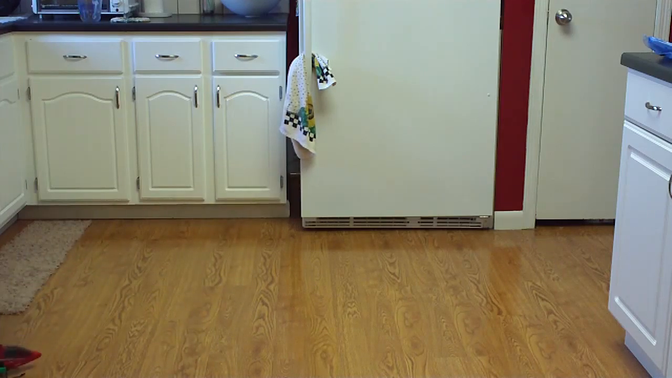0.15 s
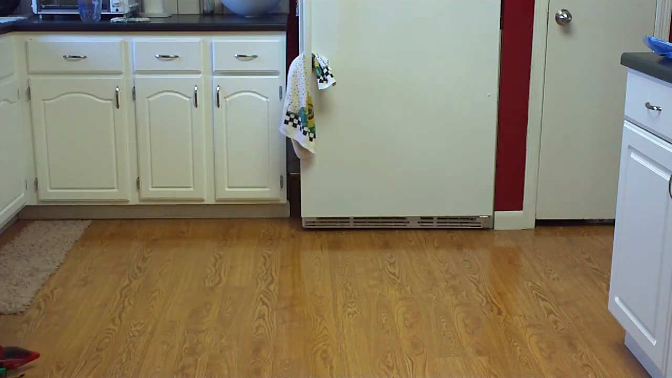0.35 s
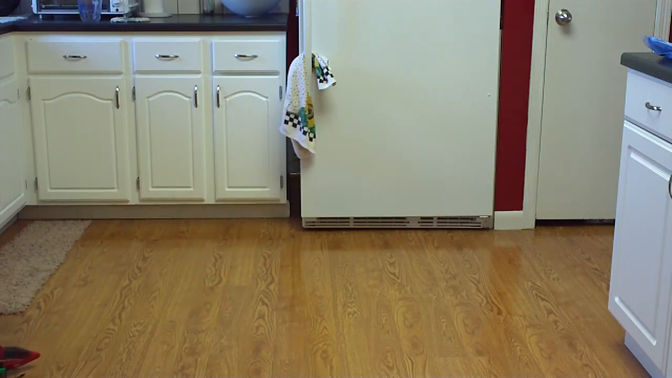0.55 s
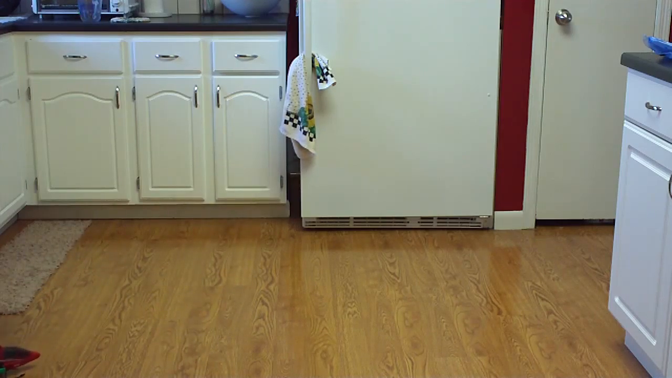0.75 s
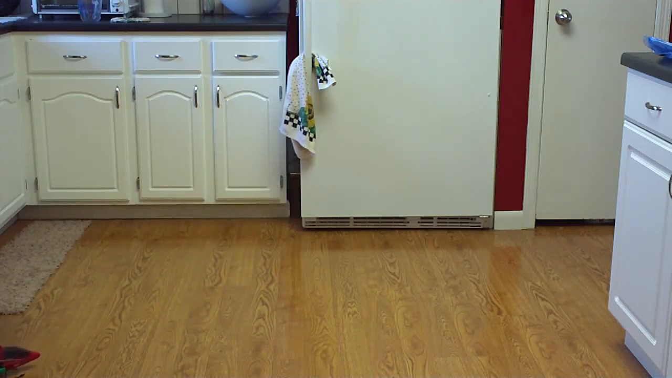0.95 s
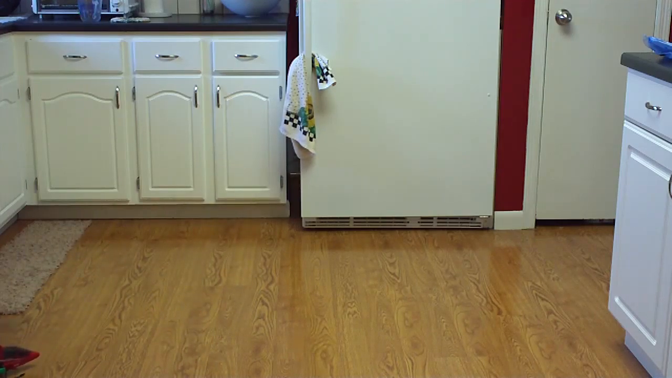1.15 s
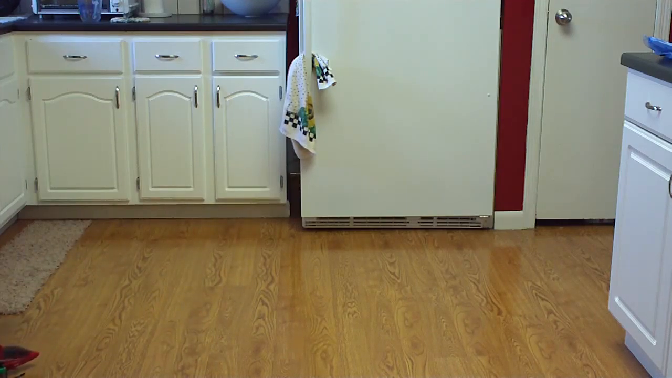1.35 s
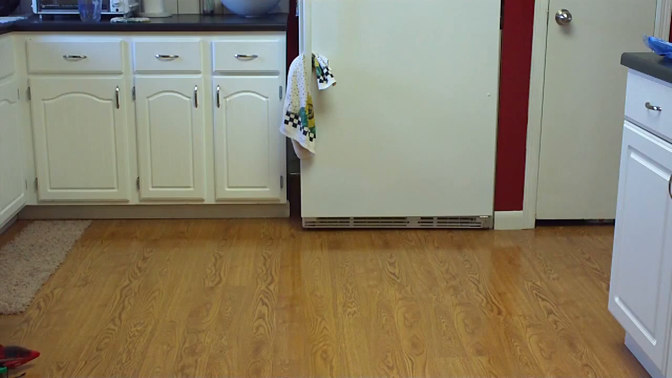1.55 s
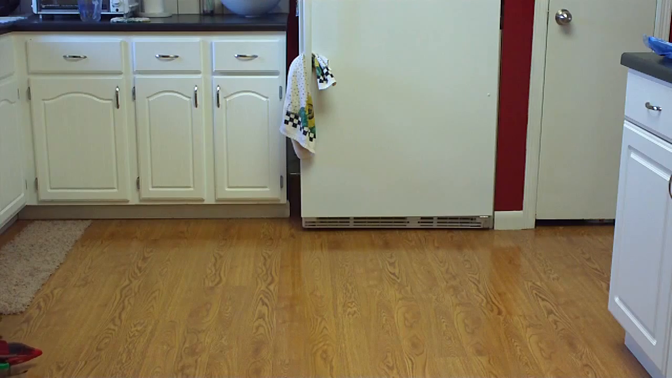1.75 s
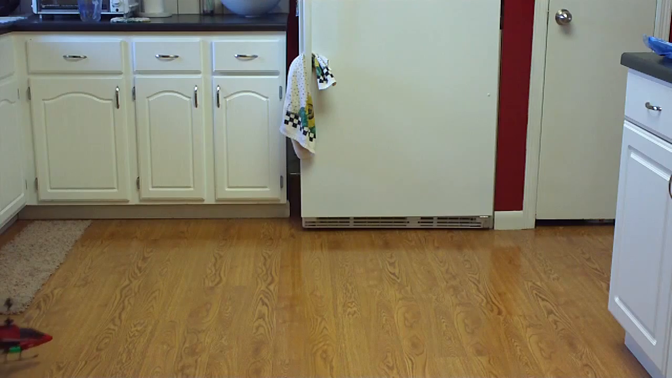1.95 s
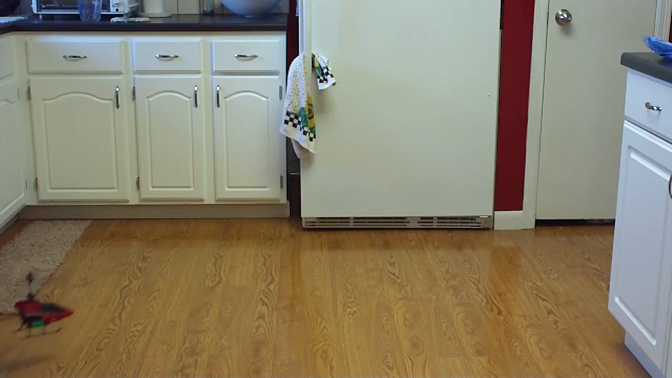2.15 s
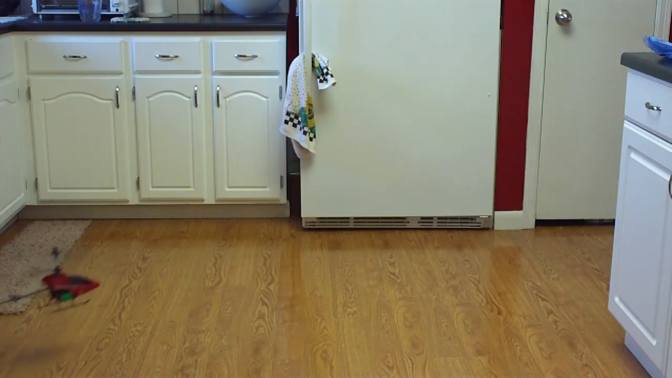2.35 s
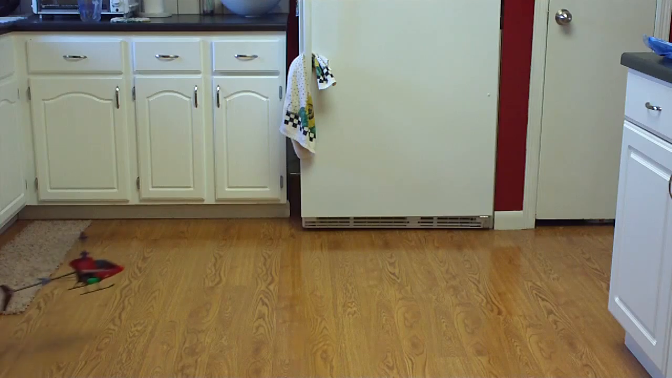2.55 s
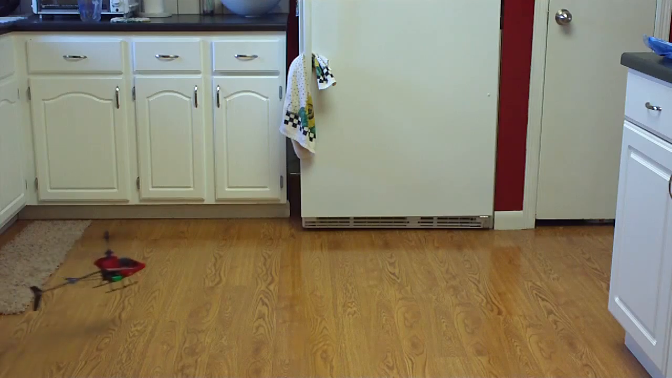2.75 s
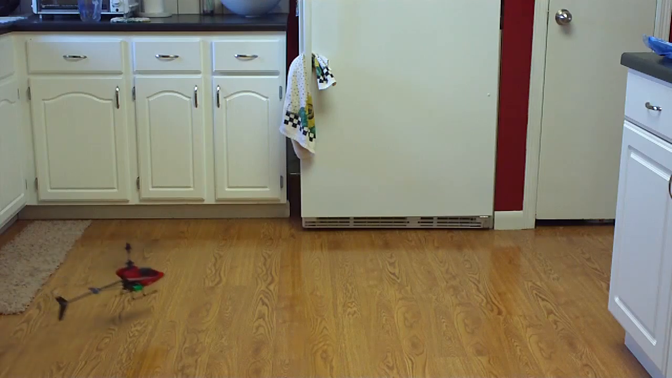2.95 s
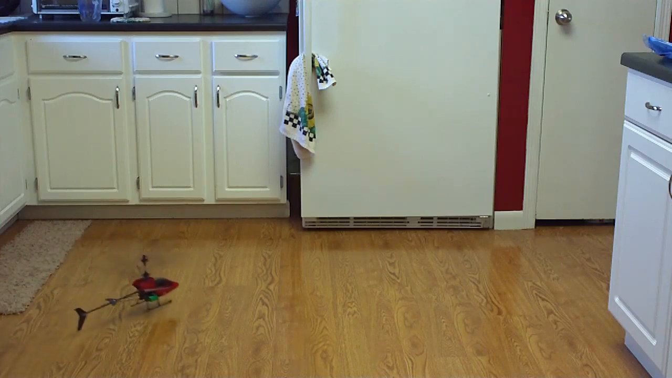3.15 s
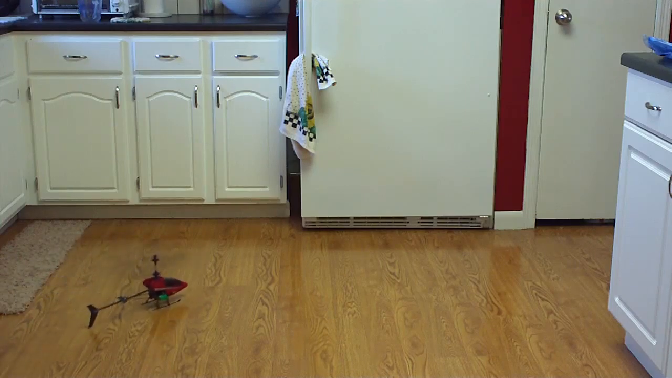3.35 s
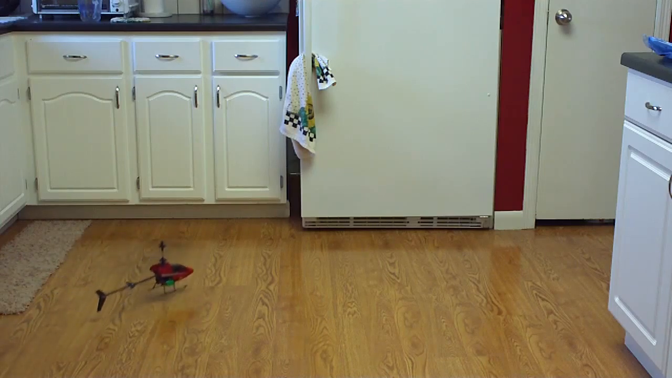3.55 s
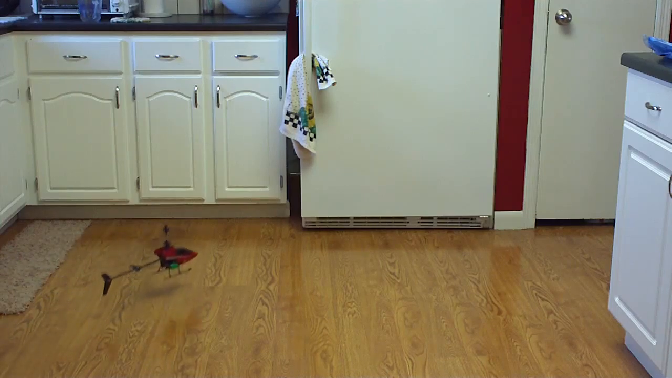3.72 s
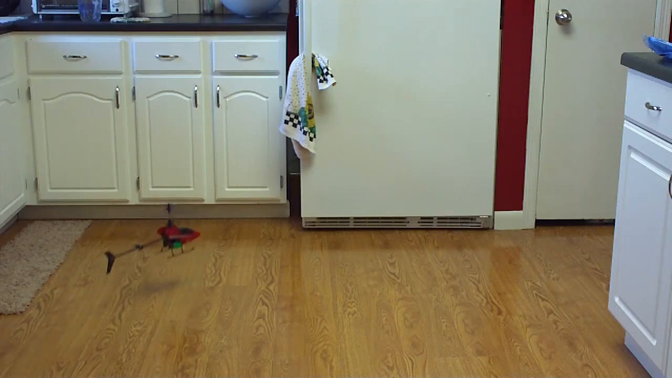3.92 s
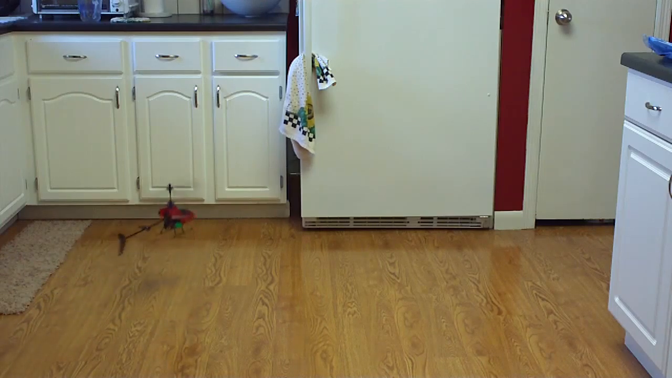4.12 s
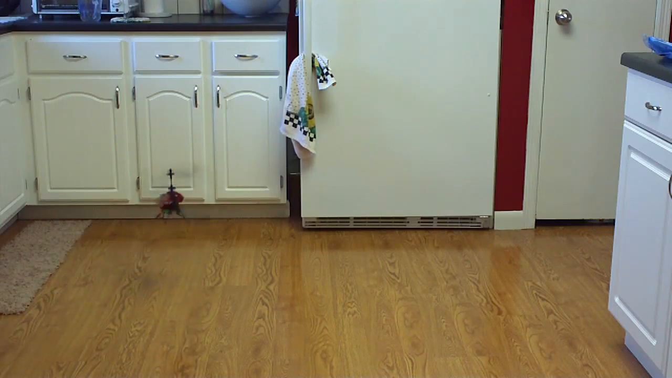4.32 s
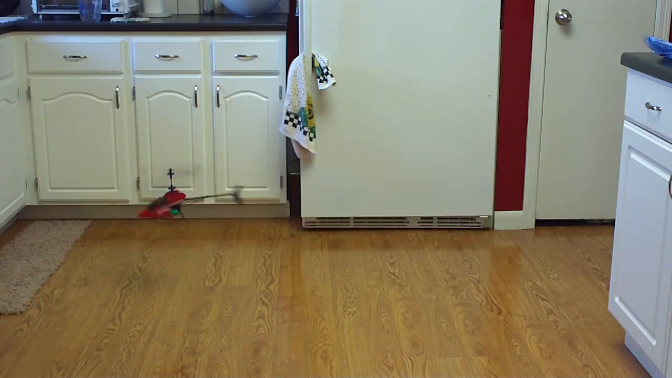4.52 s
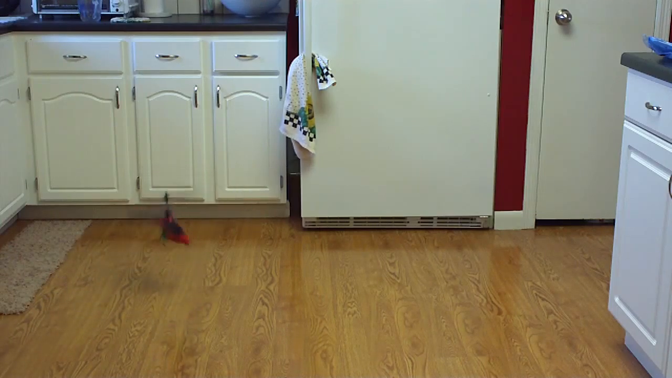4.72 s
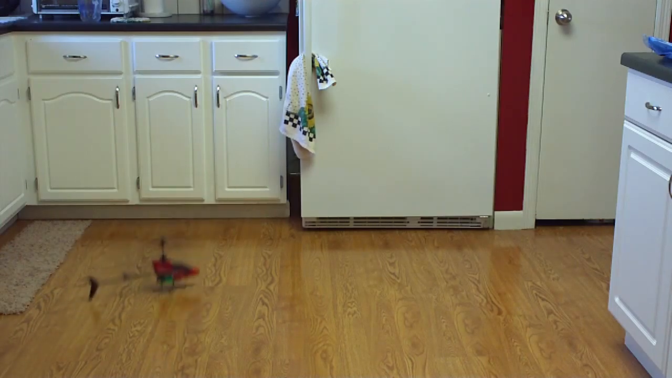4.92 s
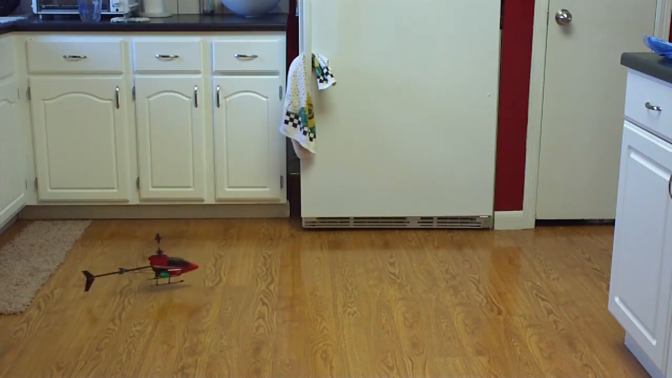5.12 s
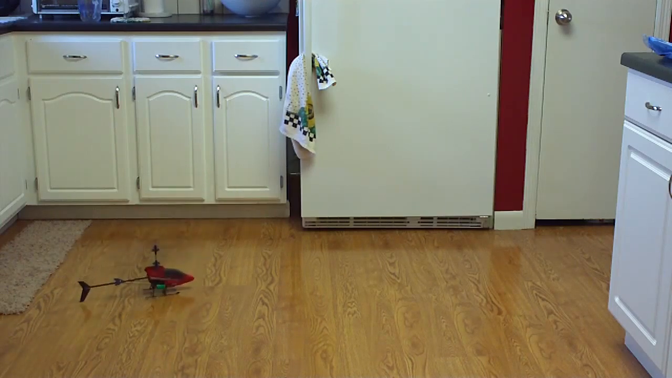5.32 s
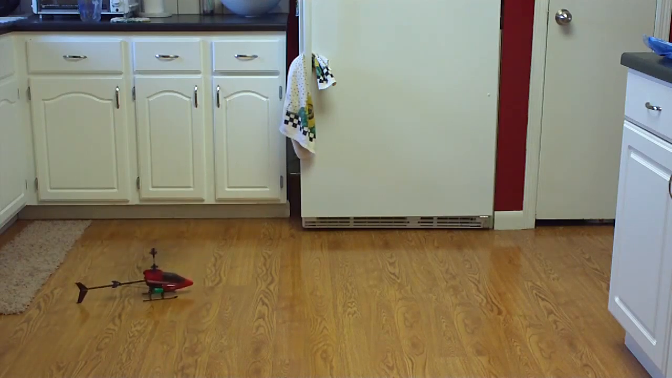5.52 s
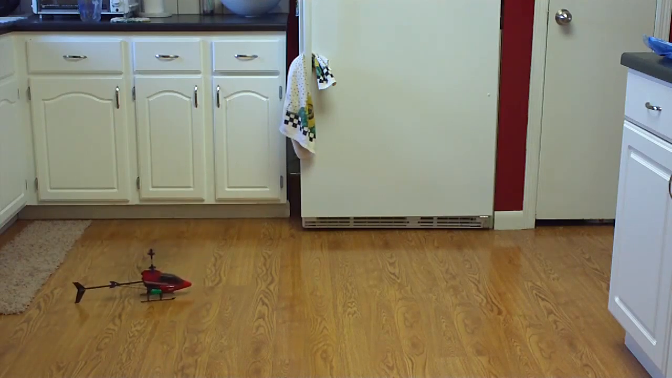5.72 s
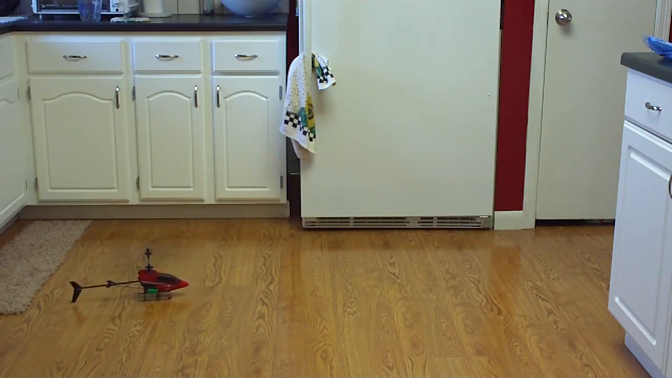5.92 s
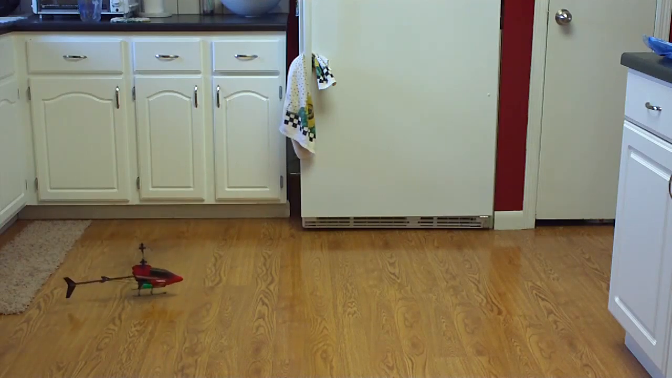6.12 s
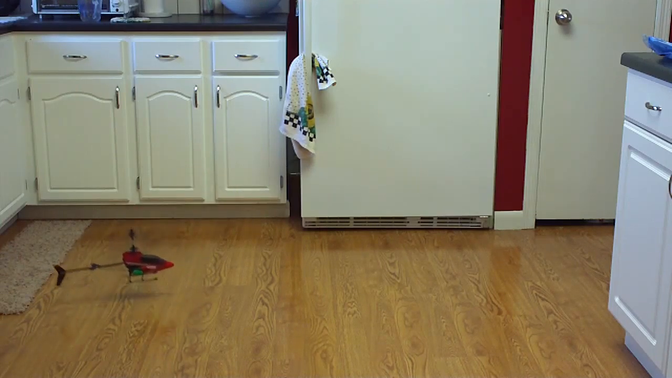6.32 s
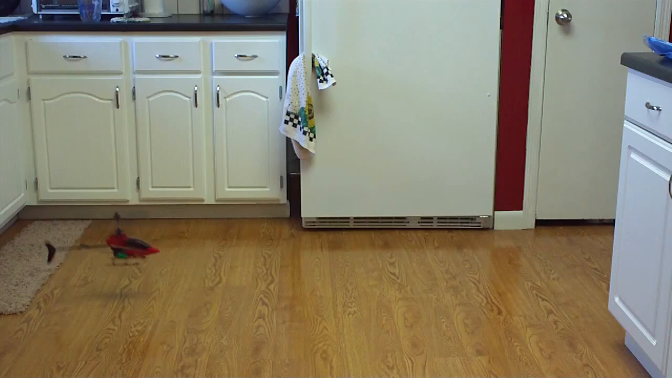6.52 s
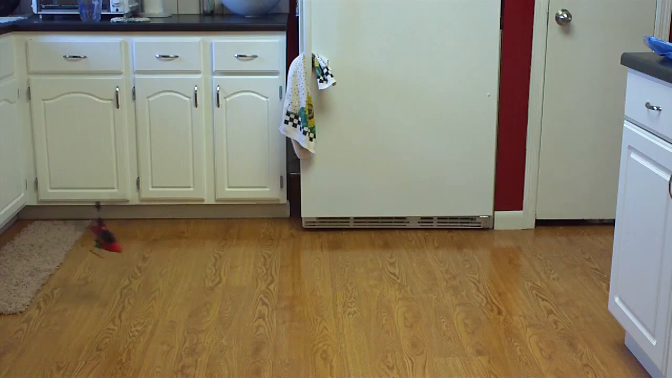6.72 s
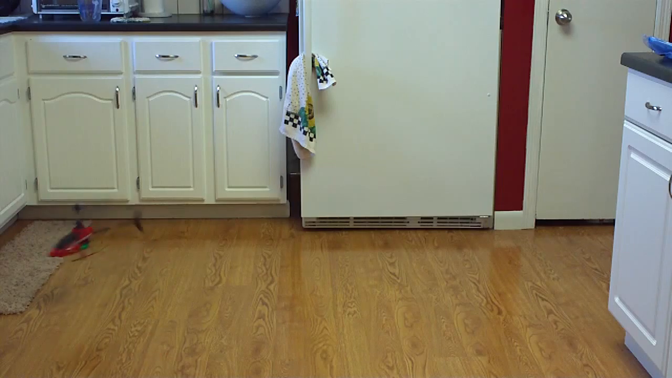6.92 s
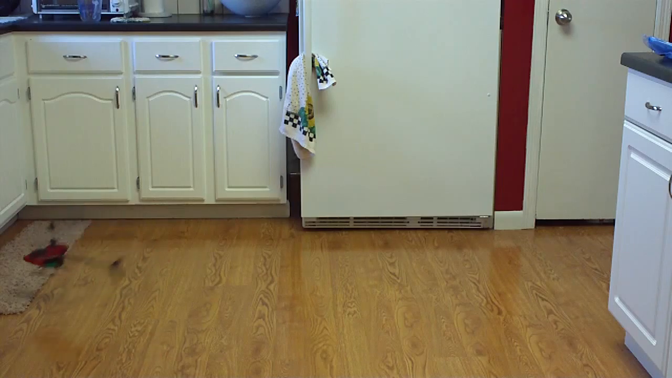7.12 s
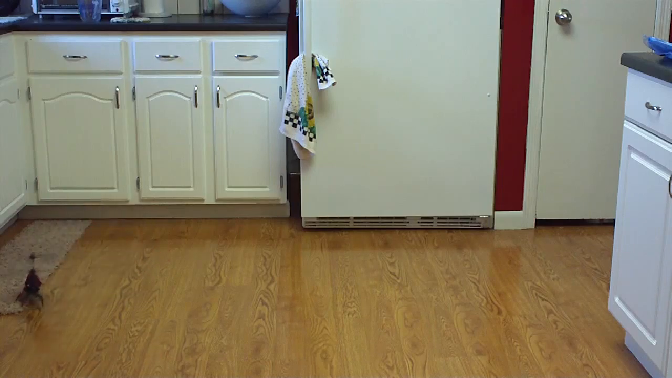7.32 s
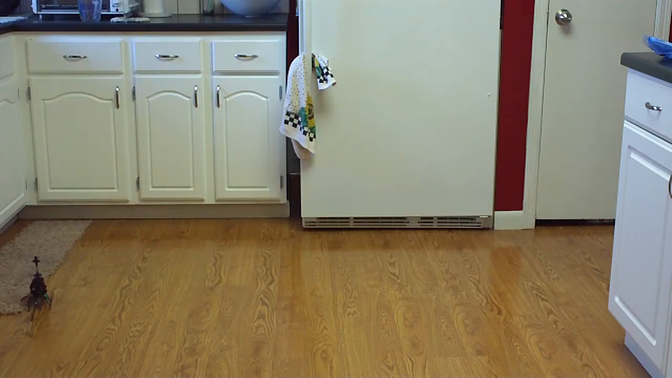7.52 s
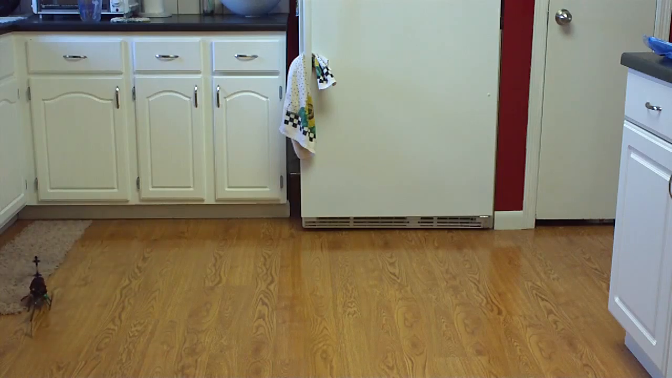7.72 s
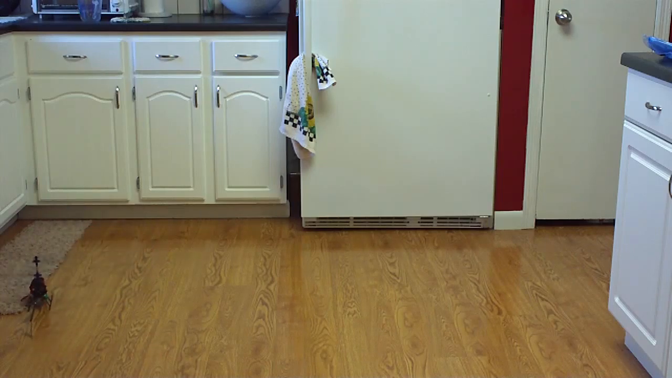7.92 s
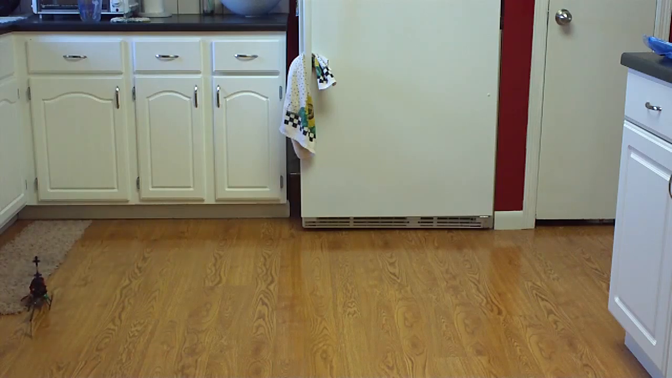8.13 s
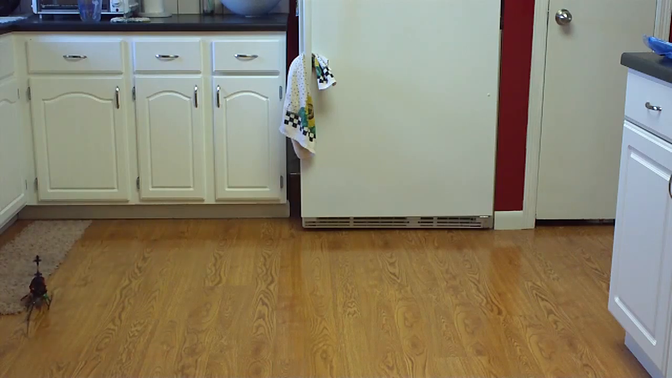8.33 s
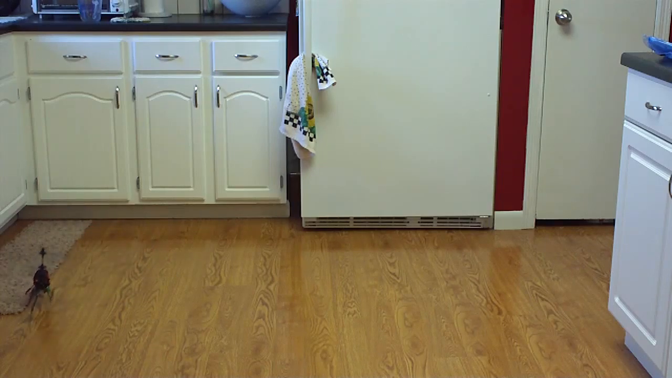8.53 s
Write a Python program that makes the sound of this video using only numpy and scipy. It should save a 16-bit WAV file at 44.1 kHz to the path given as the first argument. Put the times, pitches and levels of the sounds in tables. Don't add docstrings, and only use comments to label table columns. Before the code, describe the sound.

Two slightly detuned gear whines rise and sag over rotor hum and hiss, with clusters of hard plastic skid clacks on a wooden floor.

```python
import sys
import numpy as np
from scipy import signal
from scipy.fft import rfft, irfft, next_fast_len
from scipy.io import wavfile
from scipy.ndimage import uniform_filter1d, map_coordinates

SR = 44100
rng = np.random.default_rng(int(sys.argv[2]) if len(sys.argv) > 2 else 0)


def makeup_ratio(level_db):
    decades = np.asarray(level_db, float) / 20
    return 10 ** decades


def to_wav(sig):
    pcm = np.clip(np.atleast_2d(sig), -1, 1) * 32767
    pcm = np.round(pcm).astype(np.int16)
    wavfile.write(sys.argv[1], SR, pcm.T)


N = 382347
TIME_S = np.arange(N) / SR
CRUISE_HZ = 2100


def unit(x):
    return x / np.sqrt(np.mean(x ** 2) + 1e-20)


def along(points, hz):
    f, v = np.transpose(points)
    return np.interp(np.log(hz + 1), np.log(f + 1), v)


def curves(rows):
    s, *cols = np.transpose(rows)
    return [np.interp(TIME_S, s, c) for c in cols]


def wobble(rate_hz):
    knots = rng.standard_normal(int(N * rate_hz / SR) + 4)
    return map_coordinates(knots, [np.arange(N) * rate_hz / SR])


def lag(x, seconds):
    keep = np.exp(-1 / (seconds * SR))
    return x[..., :1] + signal.lfilter([1 - keep], [1, -keep], x - x[..., :1])


def filtered(x, response):
    m = next_fast_len(len(x) + SR // 2)
    return irfft(rfft(x, m) * response(np.fft.rfftfreq(m, 1 / SR)), m)[:len(x)]


def resonant(modes):
    def response(f):
        total = 0
        for k, (centre, width, db) in enumerate(modes):
            total = total + (-1) ** k * makeup_ratio(db) * 1j * f * width / (centre * centre - f * f + 1j * f * width)
        return total
    return response


def heard_db(modes, hz):
    grid_hz = np.geomspace(40, 8000, num=3000)
    power = sum(np.abs(resonant([mode])(grid_hz)) ** 2 for mode in modes)
    return np.interp(hz, grid_hz, 10 * np.log10(power + 1e-6))


def coloured(spectrum):
    return lambda f: makeup_ratio(along(spectrum, f))


def patchy(depth_db):
    z = signal.stft(rng.standard_normal(N), nperseg=512)[2]
    field = uniform_filter1d(rng.standard_normal(z.shape), 6, 0)
    field = uniform_filter1d(field, 14, 1)
    return signal.istft(z * makeup_ratio(depth_db * unit(field)), nperseg=512)[1][:N]


def phase(hz, flutter):
    return 2 * np.pi * np.cumsum(hz * (1 + flutter * wobble(40))) / SR


def orders(turn, levels_db, unsteady_db, blur, grit):
    sizes = [makeup_ratio(db + unsteady_db * wobble(25)) * (1 + grit * (k + .2) * wobble(400))
             for k, db in enumerate(levels_db)]
    return sum(np.sqrt(2) * size * np.sin((k + 1) * (turn + blur * wobble(70)))
               for k, size in enumerate(sizes))


# start in seconds, mesh speed the upper motor heads for in Hz, the lower in Hz.
STICK_MOVES = [(0.0, 1370, 1554), (0.08, 981, 790), (0.58, 1290, 967), (0.68, 1780, 1480),
               (1.128, 1710, 1564), (1.35, 2057, 1800), (1.59, 2380, 2047), (1.82, 2278, 2072),
               (2.31, 2114, 1945), (2.579, 2128, 1913), (2.98, 2349, 2024), (3.32, 2309, 2057),
               (4.01, 2362, 1920), (4.28, 2295, 1530), (4.37, 2123, 1601), (4.92, 1920, 1754),
               (5.17, 1913, 1488), (5.42, 2055, 1925), (5.78, 2203, 1990), (5.96, 2281, 2080),
               (6.44, 2000, 2153), (6.88, 1844, 2045), (7.17, 1518, 1612), (7.43, 1103, 812),
               (7.979, 1698, 1054), (8.081, 2302, 1797), (8.3, 2399, 2078)]


def motors():
    thumb_s, rotor_s = .07, .158
    most_coast, most_pull = .25, 0.096
    s, *goal_hz = np.transpose(STICK_MOVES)
    move = np.maximum(np.searchsorted(s, TIME_S, "right") - 1, 0)
    wanted_hz = lag(np.array(goal_hz)[:, move], thumb_s)
    mesh_hz = lag(wanted_hz, rotor_s)
    return mesh_hz, np.clip(wanted_hz / mesh_hz - 1, -most_coast, most_pull)


# centre in Hz, width in Hz, level in dB.
HOUSING_MODES = [(1027, 60, 23.5), (1200, 85, 5.5), (1380, 94, 6), (1530, 85, 7.5), (1623, 60, 9),
                 (1774, 26, 6), (1860, 220, -5), (2138.6, 80, 2), (2289, 70, 4), (2388, 33, 8)]
# centre in Hz, width in Hz, level in dB.
PLATE_MODES = [(1670, 210, 9.5), (3130, 310, 4.5), (3913, 170, 2.5), (4084, 200, 3), (4310, 130, 5.5),
               (4520, 310, 6), (4750, 820, 3)]
# offset in rotor turns, level in dB.
MESH_SIDEBANDS = [(1, -1), (4.2, -5), (5.2, -6)]


def gear_whine(mesh_hz, pull, orders_db, per_octave_db, side_db, start_s):
    teeth = 36
    load_db, coast_db, slack = 16, 130, .06
    effort_db = load_db * pull + coast_db * np.minimum(pull + slack, 0)
    effort_db = effort_db + per_octave_db * np.log2(mesh_hz / CRUISE_HZ) + .5 * wobble(3.5)
    levels_db = [db + effort_db + heard_db(PLATE_MODES if k else HOUSING_MODES, (k + 1) * mesh_hz)
                 for k, db in enumerate(orders_db)]
    turn = phase(mesh_hz, flutter=.002)
    sides = sum(makeup_ratio(db + 2.5 * wobble(8)) * np.sin(turn * (1 + k / teeth)) for k, db in MESH_SIDEBANDS)
    throb = 1 + .45 * np.cos(turn / teeth + wobble(6))
    whine = throb * orders(turn, levels_db, unsteady_db=2.2, blur=.17, grit=.45)
    whine = whine + makeup_ratio(levels_db[0] + side_db) * sides
    return whine * np.clip((TIME_S - start_s) / 0.03, 0, 1)


# time in seconds, height in m, rotor disc tilt toward the microphone in dB.
FLIGHT = [(0, 0, -3), (1.75, 0, -5.5), (2.0, 0.028, 0.5), (2.45, 0.066, -2), (2.9, 0.023, 2.5),
          (3.4, 0.11, -5.5), (3.9, 0.14, -8.5), (4.2, 0.18, -1.5), (4.7, 0.15, 0), (5.05, 0.0046, -1),
          (5.6, 0, -10), (5.8, 0.11, -7), (6.3, 0.082, -3), (6.7, .15, 0), (7.25, 0.14, 0),
          (7.35, 0.015, -24), (8.3, 0, -17.5), (8.5, .1, -5)]
# centre in Hz, width in Hz, level in dB.
HUM_MODES = [(122, 44, 2.5), (233.1, 14, -1), (346, 36, -0.5)]


def blade_hum(turn, cross_hz, octaves):
    height_m, tilt_db = curves(FLIGHT)
    aimed_db = [91 * height_m, tilt_db, 0.34 * tilt_db]
    hum_db = [db + aimed_db[k] + 15 * octaves + heard_db(HUM_MODES, (k + 1) * cross_hz)
              for k, db in enumerate([-58, -38.5, -48])]
    hum = orders(turn, hum_db, unsteady_db=2.0, blur=0.12, grit=.05)
    hum += makeup_ratio(hum_db[1] - 9 + 3 * wobble(3)) * np.sin(1.5 * turn)
    return hum * np.clip(TIME_S - 1, 0, 1)


# centre in Hz, width in Hz, level in dB.
FRAME_MODES = [(628, 120, -7.5), (900, 65, -3), (1002.5, 32.2, 5.5), (1101, 126, -0.5), (1399, 30, -7.5)]
# frequency in Hz, density in dB per Hz.
HISS_SPECTRUM = [(710, -14.5), (1200, -7), (1400, 0), (1990, -6.5), (2360, -3.5), (3520, -9.5),
                 (4430, -6.5), (5830, -13.5), (6230, -15.5), (6710, -17), (7070, -17.5), (9190, -61.5),
                 (15600, -120)]
# frequency in Hz, density in dB per Hz.
WASH_SPECTRUM = [(41, -29.5), (70, -3.5), (247, -3.5), (293, -6), (359, -3), (421, -3), (900, -0.5),
                 (1170, -27.5), (1980, -120)]
# frequency in Hz, density in dB per Hz.
RUMBLE_SPECTRUM = [(2.9, -36), (5.0, 10.5), (24, 6.5), (70, -3), (86, -20.5), (110, -4.5), (140, -18.5),
                   (240, -120)]


def rush(turn, octaves, pull, near_db):
    shake = shaking()

    def gain(cruise_db, per_octave_db, per_pull_db, shaken_db):
        return makeup_ratio(cruise_db + per_octave_db * octaves + per_pull_db * pull) + makeup_ratio(shaken_db) * shake

    chop = 1 + .2 * np.cos(turn) + .15 * np.cos(turn / 2)
    rattle = unit(filtered(patchy(0.79) * chop, resonant(FRAME_MODES)))
    rattle *= gain(-36.5, 5.5, 4.5, -20.5) * makeup_ratio(1.4 * wobble(9.9))
    hiss = unit(filtered(patchy(0.52) * chop, coloured(HISS_SPECTRUM)))
    hiss *= gain(-36, 10, 5.5, -41.5) * makeup_ratio(0.43 + 0.23 * wobble(9.4))
    wash = unit(filtered(patchy(1.8), coloured(WASH_SPECTRUM)))
    wash *= gain(-42, 8.5, 4, -30.5) * makeup_ratio(4.0)
    rumble = unit(filtered(patchy(0.29), coloured(RUMBLE_SPECTRUM)))
    rumble *= gain(-40.5, -2, 1, -21.5) * makeup_ratio(-0.5 + 1.8 * wobble(4.5))
    return makeup_ratio(near_db) * (rattle + hiss + wash) + rumble


# start in seconds, crack peak in dB, knock in dB, echo of the crack in dB.
CONTACTS = [(.0824, -26, -10.5, -22), (.0897, -8.5, -17, -17), (.2214, -26, -19, -25.5),
            (.2478, -28, -16, -30), (.2813, -25, -35, -28), (.3102, -15, -17, -23),
            (.3524, -29, -21, -30.5), (5.0579, -17, -9.5, -14.5), (5.0645, -15.5, -18.5, -20),
            (5.3867, -20, -13, -18.5), (5.5453, -23, -25.5, -27), (5.6121, -19, -22.5, -23.5),
            (5.687, -24, -28, -26.5), (7.4116, -22, -20, -30.5), (7.4444, -48, -23, -52),
            (7.5168, -29, -29, -35), (7.5837, -20, -16.5, -17.5), (7.6194, -27, -25, -31.5),
            (7.6964, -23.5, -35, -27.5), (8.2057, -28, -28, -27), (8.2601, -28, -29, -25.5)]


def shaking():
    delay_s, shake_s = 0.085, 0.041
    s, _, knock_db, _ = np.transpose(CONTACTS)
    blows = np.bincount(np.round(s * SR).astype(int), makeup_ratio(knock_db), N)
    return lag(lag(blows, delay_s), shake_s) * shake_s * SR


# centre in Hz, width in Hz, level in dB.
SKID_MODES = [(2210, 1700, -4.5), (3183, 590, 6), (4200, 650, 3.5), (5290, 1350, -2.5)]
# centre in Hz, width in Hz, level in dB.
BOARD_MODES = [(175, 29, -12.5), (634, 110, -5), (827, 142, -1.5), (1071, 70, -0.5), (1554, 220, -12.5)]


def knocks():
    out, t = np.zeros(N + SR), np.arange(SR // 3) / SR
    crack = filtered((t == 0) * 1., resonant(SKID_MODES))
    crack /= np.abs(crack).max()
    push = np.sin(2 * np.pi * 7 * t) * makeup_ratio(-60 * t / .3)
    for s, crack_db, knock_db, echo_db in CONTACTS:
        chatter = 0.3 * rng.standard_normal(len(t)) * makeup_ratio(-60 * t / 0.033)
        wood = filtered(np.roll((t == 0) + chatter, 40), resonant(BOARD_MODES))
        knock = signal.fftconvolve(wood / np.abs(wood).max(), tail(3.64))[:len(t)]
        echo = signal.fftconvolve(crack, tail(19.84))[:len(t)]
        heard = makeup_ratio(crack_db + 3) * crack + makeup_ratio(echo_db - 9) * echo
        heard = heard + makeup_ratio(knock_db - 3) * knock + makeup_ratio(knock_db - 7.5) * push
        out[round(s * SR):][:len(t)] += heard
    return out[:N]


# start in seconds, frequency in Hz, level in dB, t60 in seconds.
FLOOR_THUDS = [(0.087, 175.3, -28.5, 0.29), (.25, 176, -29, 0.22), (5.061, 200, -31, 0.19),
               (5.061, 600, -17.5, 0.34), (5.06, 301, -30, 0.21), (5.07, 1085, -24, 0.73),
               (5.389, 1075, -21, 0.62), (7.416, 117, -28, .3), (7.44, 122, -22, 0.21),
               (7.435, 1050, -22, 0.2)]


def thuds():
    out, t = np.zeros(N + SR), np.arange(SR) / SR
    for s, hz, db, t60_s in FLOOR_THUDS:
        envelope = makeup_ratio(db - 60 * t / t60_s) * (1 - np.exp(-t / 0.01))
        ring = np.sin(2 * np.pi * hz * t + 0.92 * wobble(60.8)[:SR])
        out[round(s * SR):][:len(t)] += envelope * ring
    return out[:N]


# frequency in Hz, t60 in seconds.
KITCHEN_T60 = [(150, 0.23), (1000, 0.51), (3000, 0.63), (7000, 0.14)]


def tail(level_db):
    hz, t, z = signal.stft(rng.standard_normal(SR // 3), SR, nperseg=256)
    late = signal.istft(z * makeup_ratio(-60 * t / along(KITCHEN_T60, hz)[:, None]), SR, nperseg=256)[1]
    late *= 1 - np.exp(-np.arange(len(late)) / SR / 0.00052)
    late *= makeup_ratio(level_db) / np.linalg.norm(late)
    late[0] = 1
    return late


# time in seconds, upper gear toward microphone in dB, lower in dB, nearness in dB.
FACING_MICROPHONE = [(0, 16, -3, 1.5), (.66, -5, 1, 0), (.765, 1, 4, 2), (1.0, -6, 0, 3), (1.7, -2, 0, 0),
                     (2.1, 0, -4.5, 0.5), (2.7, -2, -1, -1), (3.3, 3, -3, 0.5), (4.4, 0.5, -3, 0),
                     (4.65, 1.5, -2, 0.5), (5.2, -9.5, -7, 0.5), (5.6, -7.5, -1, -0.5), (6.4, 2, -3, 1),
                     (6.9, -0.5, -2.5, -1), (7.4, -3, 0.5, 1), (7.95, -1.5, 1.5, -1), (8.17, -7, 4.5, 0),
                     (8.6, 3, -8.5, 1)]


def scene():
    mesh_hz, pull = motors()
    upper_db, lower_db, near_db = curves(FACING_MICROPHONE)
    upper = gear_whine(mesh_hz[0], pull[0], orders_db=[-52.5, -54, -45.5], per_octave_db=15.5,
                       side_db=.1, start_s=1.05)
    lower = gear_whine(mesh_hz[1], pull[1], orders_db=[-44, -51.5, -59], per_octave_db=6.5,
                       side_db=-11, start_s=-1)
    whine = makeup_ratio(upper_db) * upper + makeup_ratio(lower_db) * lower
    ringing = signal.fftconvolve(whine, tail(-6))[:N]
    ringing = filtered(ringing, lambda hz: 1 / (1 + (hz / 5600) ** 12))

    cross_hz = mesh_hz.mean(0) / 17.15
    octaves = np.log2(mesh_hz.mean(0) / CRUISE_HZ)
    turn = phase(cross_hz, flutter=0.0027)
    air = blade_hum(turn, cross_hz, octaves) + rush(turn, octaves, pull.mean(0), near_db)
    return (ringing + air + knocks() + thuds())[None]


def band_limit(x):
    return signal.sosfilt(signal.butter(12, 7220, fs=SR, output="sos"), x)


# frequency in Hz, threshold in dB.
MASK_THRESHOLD = [(1500, -60), (2500, -14), (3500, -5), (4500, -10), (5500, -3), (6200, 2), (6700, 0),
                  (7200, 2)]


def record(dry):
    band = filtered(dry[0], lambda hz: 1 / (1 + (hz / 7250) ** 60))
    hz, _, z = signal.stft(band, SR, nperseg=2048, noverlap=1536)
    power = uniform_filter1d(np.abs(z) ** 2, size=3, axis=0)
    power = uniform_filter1d(power, size=3, axis=1)
    mask = uniform_filter1d(power, size=41, axis=0) * makeup_ratio(2 * along(MASK_THRESHOLD, hz))[:, None]
    kept = signal.istft(z * (power > mask), SR, nperseg=2048, noverlap=1536)[1][:N]
    return band_limit(kept[None])


dry = scene()
out = record(dry)
to_wav(out)
```